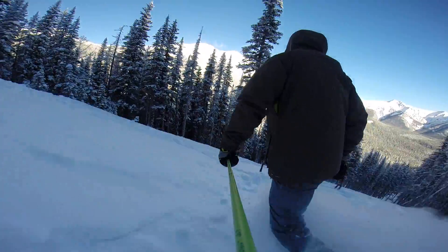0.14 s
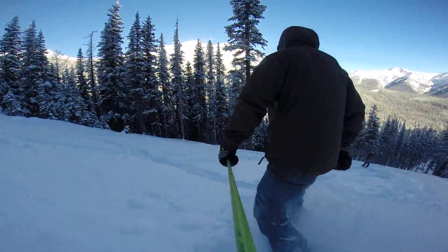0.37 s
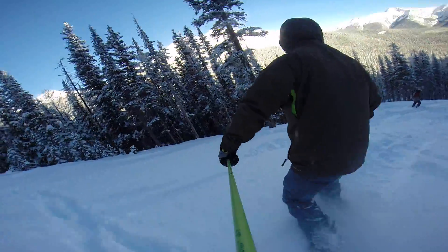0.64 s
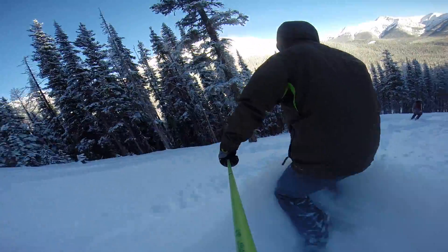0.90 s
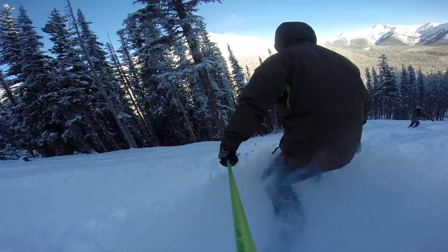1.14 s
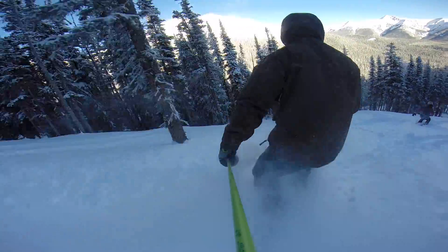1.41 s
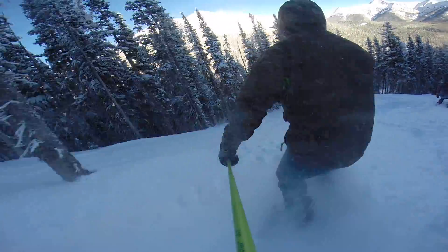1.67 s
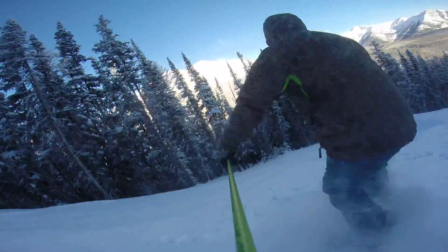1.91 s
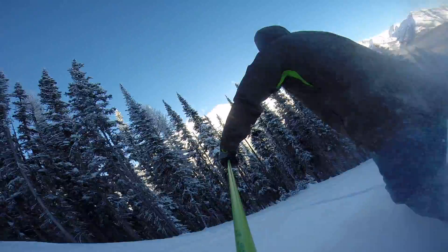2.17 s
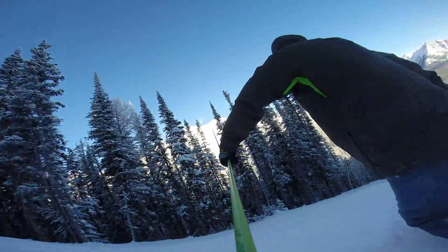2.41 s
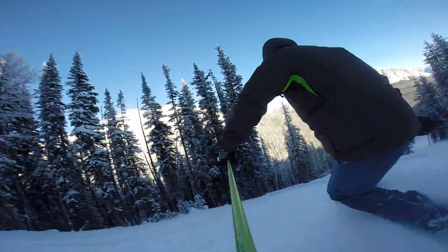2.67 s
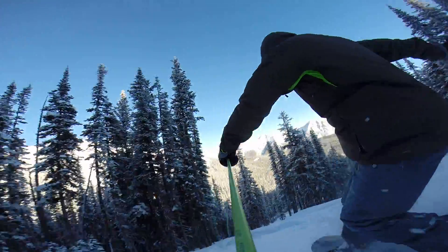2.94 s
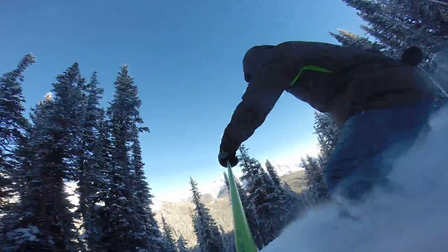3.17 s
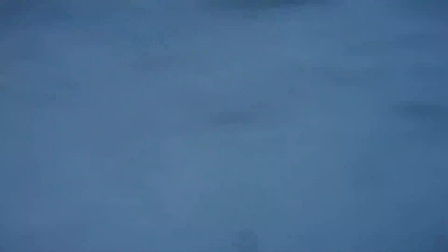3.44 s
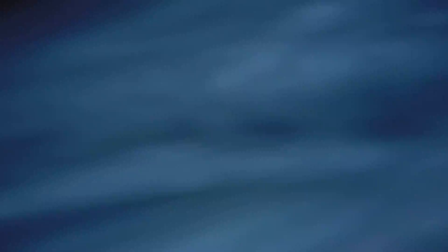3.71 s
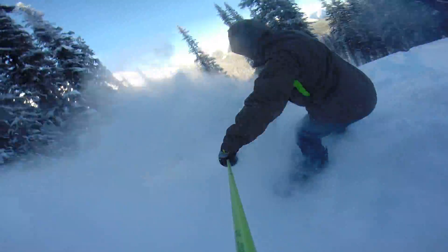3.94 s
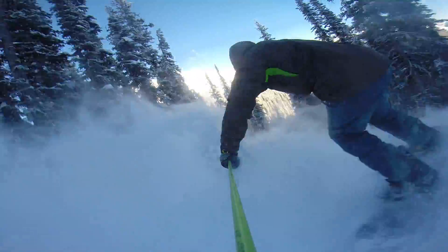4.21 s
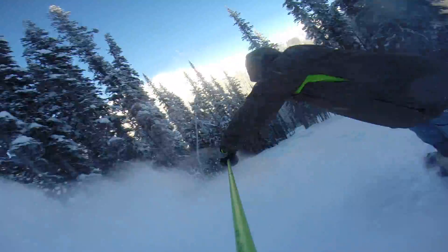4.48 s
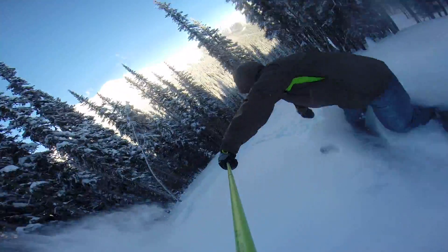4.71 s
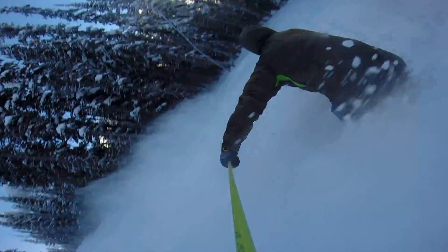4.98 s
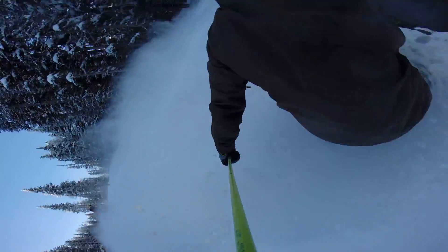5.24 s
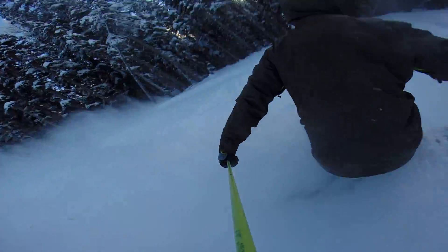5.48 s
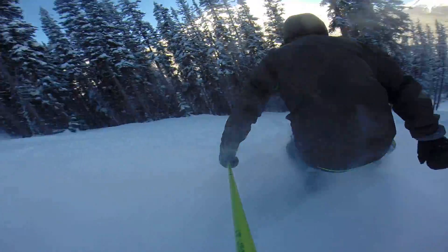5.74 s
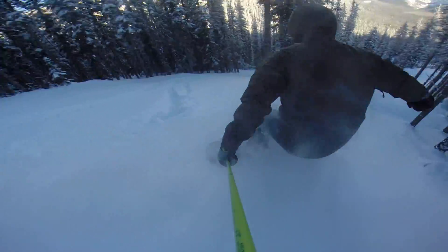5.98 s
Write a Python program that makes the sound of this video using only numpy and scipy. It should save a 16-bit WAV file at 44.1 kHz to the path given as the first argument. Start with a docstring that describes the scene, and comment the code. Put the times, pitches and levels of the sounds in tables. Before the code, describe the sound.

Heard from a microphone sealed in a case on a hand-held pole, a snowboard whispers through powder on an open mountain slope. Soft hisses and ticks grow into swishing crystal spray, then a lump of snow smashes into the case with loud crunches and thumps. After a brief lull come sharp icy knocks, a deep wobble and heavy churning snow, then softer hiss.

```python
"""A snowboard carves through deep powder: grains and noise hiss and churn, muffled by a camera's sealed case.
Thrown crystals patter on the case as clumped clicks; lumps of snow burst on it in rough noise,
the mount thumps in sagging sines, and icy bits tick the ringing wall. The hand-held pole hums in two bending modes,
wind buffets the case with eddies and broad noise, and the camera adds a faint whine and self-noise.
Table levels are fader moves; each layer adds its own trim."""
import sys
import numpy as np
from scipy import signal
from scipy.fft import rfft, irfft, next_fast_len
from scipy.io import wavfile
from scipy.ndimage import uniform_filter1d, map_coordinates

SR = 44100
rng = np.random.default_rng(int(sys.argv[2]) if len(sys.argv) > 2 else 0)


def int16_out(signal):
    """Quantize to a 16-bit WAV file."""
    q = np.round(np.clip(np.atleast_2d(signal).T, -1, 1) * 32767)
    wavfile.write(sys.argv[1], SR, q.astype(np.int16))


def attenuation_scalar(level_db):
    """Turn a level in dB into a linear amplitude multiplier (20 dB per decade)."""
    decades = np.asarray(level_db, float) / 20
    return 10 ** decades


N = 269892


def unit(x):
    """Scale to rms 1."""
    return x / np.sqrt(np.mean(x ** 2) + 1e-20)


def curves(rows):
    """One value per sample for each column after the time."""
    s, *cols = np.transpose(rows)
    return [np.interp(np.arange(N) / SR, s, c) for c in cols]


def wobble(rate):
    """A smooth random curve, rate knots a second."""
    knots = rng.standard_normal(int(N * rate / SR) + 4)
    return map_coordinates(knots, [np.arange(N) * rate / SR])


def filtered(x, response):
    """x times a complex response of frequency."""
    m = next_fast_len(len(x) + 8192)
    return irfft(rfft(x, m) * response(np.fft.rfftfreq(m, 1 / SR)), m)[:len(x)]


def coloured(x, spectrum):
    """x through (f/Hz, level/dB) points joined on a log frequency axis, at rms 1."""
    f, db = np.transpose(spectrum)

    def response(hz):
        return attenuation_scalar(np.interp(np.log(hz + 1), np.log(f + 1), db, -120, -120))

    return unit(filtered(x, response))


def resonance(f, centre, width):
    """Response of two equal bandpass resonances in a row."""
    return (1j * f * width / (centre * centre - f * f + 1j * f * width)) ** 2


def grit(per_second, spread_db):
    """Random tiny impacts of either sign, some bigger than the rest."""
    hit, size, sign = rng.random((3, N))
    height = attenuation_scalar(-spread_db * np.log(size + .01))
    return (hit < per_second / SR) * height * np.sign(sign - .5)


def fading(t, rise, t60):
    """Envelope of a blow: a quick rise and an exponential decay, both in seconds."""
    return attenuation_scalar(-60 * t / max(t60, .002)) * (1 - np.exp(-t / max(rise, 1e-4)))


def patches(x, depth_db):
    """Random louder and softer spots, about 1.5 kHz by 15 ms."""
    z = signal.stft(x, nperseg=256)[2]
    field = uniform_filter1d(rng.standard_normal(z.shape), size=9, axis=0)
    field = uniform_filter1d(field, size=5, axis=1)
    return unit(signal.istft(z * attenuation_scalar(depth_db * unit(field)), nperseg=256)[1][:N])


def swells(start, length, db, rise, fall, dome_db):
    """Gain of swells that climb at rise dB/s, arch by dome_db over their length and sink at fall dB/s."""
    late = np.arange(0, N + 32, 32)[None] / SR - np.asarray(start)[:, None]  # every 32 samples
    span = np.abs(length)[:, None] + 1e-3
    arch_db = -dome_db * np.clip(2 * late / span - 1, -1, 1) ** 2
    shape_db = arch_db + np.minimum(rise * late, 0) + np.minimum(fall * (span - late), 0)
    power = np.sum(attenuation_scalar(2 * (np.asarray(db)[:, None] + shape_db)), axis=0)
    return np.sqrt(np.interp(np.arange(N) / 32, np.arange(len(power)), power))


# the board ploughing snow: [t/s, hiss level/dB, low churn level/dB]
BOARD_MOVES = [(0, -75, -68), (.33, -56.5, -66.5), (.46, -81, -70), (1.0, -84, -70.5), (1.4, -65, -54.5),
               (1.55, -55.5, -64.5), (1.78, -56, -66), (1.9, -80, -68), (2.4, -67, -61), (2.5, -48, -55.5),
               (2.73, -57, -62.5), (2.86, -44.5, -58.5), (3.1, -46.5, -50.5), (3.8, -47, -52),
               (3.9, -53, -64), (3.97, -70.5, -71.5), (4.3, -70.5, -68), (4.7, -58, -64), (4.9, -62, -59.5),
               (5.09, -48.5, -41), (5.3, -51.5, -49), (5.4, -73, -60), (5.47, -67, -56.5), (5.52, -52, -45),
               (5.66, -51, -49), (5.7, -51, -64), (6.12, -69, -60.5)]
# colour of the fine hiss under the edge: [f/Hz, level/dB]
HISS_COLOUR = [(760, -46), (1300, -6), (1580, -1.5), (1780, 0), (2670, 1.5), (4200, -13.5), (4750, -32.5),
               (5630, -13.5), (6300, -30), (9000, -38.5), (11700, -73), (19800, -120)]
# colour of heavy churned snow, also of a wet squash: [f/Hz, level/dB]
CHURN_COLOUR = [(150, -15.5), (250, 1), (346, 1), (544, -8), (829, -1), (1300, -5.5), (1720, 2.5),
                (2120, -12), (2490, -2.5), (3280, -23.5), (5880, -13.5), (7750, -42.5), (12000, -46.5),
                (15600, -68), (22000, -120)]


def board():
    """Crushed powder: dense grains on noise, throbbing as the edge bites; the low churn crumbles coarsely."""
    hiss_db, churn_db = curves(BOARD_MOVES)
    bite = wobble(21.54)
    grains = rng.standard_normal(N) + .5 * unit(grit(1800, 4))
    hiss = coloured(patches(grains, 1.9), HISS_COLOUR)
    crumbs = rng.standard_normal(N) + 1.6 * unit(grit(380, 3.6))
    churn = coloured(patches(crumbs, 2.7), CHURN_COLOUR)
    hiss_throb_db = 1.1 * bite + 0.89 * wobble(70)
    churn_throb_db = .9 * bite + 2.3 * wobble(65)
    return attenuation_scalar(hiss_db - 3.0 + hiss_throb_db) * hiss + attenuation_scalar(churn_db + 2.0 + churn_throb_db) * churn


# fine crystals always drifting onto the case: [t/s, patter level/dB]
DRIFT_MOVES = [(0, -73.5), (1.15, -72.5), (1.5, -64), (1.85, -69), (2.05, -57.5), (2.85, -63), (2.9, -71),
               (3.42, -72), (3.5, -44.5), (3.78, -61.5), (3.82, -58.5), (3.97, -77), (4.3, -77),
               (4.45, -68), (4.9, -63), (5.1, -61.5), (5.44, -90), (5.65, -70), (6.12, -68.5)]
# sheets of thrown crystals sweeping the case: [start t/s, length t/s, patter level/dB]
SHEET_SWELLS = [(0.009, 0.0058, -50), (1.39, 0.053, -67), (1.557, 0.043, -62), (1.71, 0.082, -55.5),
                (1.893, 0.012, -59), (2.001, 0.0072, -55), (2.045, 0.053, -53), (2.171, 0.047, -45),
                (2.306, 0.028, -51), (2.349, 0.033, -46.5), (2.389, 0.057, -43.5), (2.471, 0.026, -49.5),
                (2.572, 0.024, -57), (2.63, 0.021, -54), (2.74, 0.031, -55.5), (2.816, 0.057, -50.5),
                (3.256, 0.06, -38), (3.335, 0.019, -56), (3.463, 0.0083, -23.5), (3.487, .02, -39),
                (3.65, 0.044, -45.5), (3.697, 0.024, -31.5), (3.74, 0.041, -42), (3.853, 0.068, -49),
                (4.02, 0.044, -65), (4.112, 0.041, -66), (4.185, 0.0062, -65.5), (4.313, 0.038, -67),
                (4.432, 0.012, -59.5), (4.707, .04, -62.5), (4.821, .02, -54), (4.982, 0.012, -55),
                (5.595, 0.0095, -70), (5.705, 0.012, -45), (5.77, 0.0066, -47.5), (5.82, 0.028, -67),
                (5.931, .02, -54), (6.025, 0.043, -64), (6.08, 0.029, -73)]
# colour of crystals on the case: [f/Hz, level/dB]
PATTER_COLOUR = [(530, -40), (900, -12.5), (1260, -22), (1660, -1), (2190, -4), (2500, 0.5), (3510, -3),
                 (3910, -12), (5750, 1), (6250, -5), (7960, -10.5), (13700, -15), (15400, -24.5),
                 (16000, -70)]
# resonances of the case wall, low to high: [f/Hz, width f/Hz, level/dB]
CASE_MODES = [(830, 840, 0), (2200, 1260, 7.5), (5230, 1270, 9.5), (8940, 1500, 2.5), (12040, 2700, 0)]
# how fast a sheet arrives and thins out (dB/s), and how far its edges lie under its crown (dB)
SHEET_RISE, SHEET_FALL, SHEET_DOME_DB = 1540, 1010, 3.5
# bigger crystals: (per second and resonance, dB against the drift fader, dB per kHz of resonance)
CRACKLE_PER_S, CRACKLE_DB, CRACKLE_TILT = 20, 1, -1.2


def spray():
    """Crystals click in clumps, as drift and sheets coloured by the case; bigger strays ring one wall mode each."""
    drift = attenuation_scalar(curves(DRIFT_MOVES)[0])
    sheets = swells(*np.transpose(SHEET_SWELLS), SHEET_RISE, SHEET_FALL, SHEET_DOME_DB)
    level = np.hypot(drift, sheets)
    rain = patches(1.1 * rng.standard_normal(N) + unit(grit(4000, 4.5)), 2)
    clumps_db = 1.4 * wobble(70) + 1.1 * wobble(250)
    crackle = np.zeros(N)
    for hz, width, _ in CASE_MODES[1:]:
        ringing = filtered(grit(CRACKLE_PER_S, 3.5), lambda f: resonance(f, hz, width))
        crackle += attenuation_scalar(CRACKLE_TILT * hz / 1e3) * ringing
    patter = level * attenuation_scalar(7.0 + clumps_db) * coloured(rain, PATTER_COLOUR)
    return patter + drift * attenuation_scalar(CRACKLE_DB) * unit(crackle)


# lumps of snow bursting on the case or crushed under the pole:
# [t/s, level/dB, treble level/dB against the lump, t60 t/s, wetness 0-1]
SNOW_LUMPS = [(1.269, -42, -26, 0.054, 0.5), (1.369, -36, -17, .06, 0.54), (1.399, -36, -22, 0.15, .62),
              (3.453, -0.5, -36, 0.15, 0.34), (3.644, -21.5, -8, 0.22, 0.52), (3.688, -8, -18, 0.091, 0.4),
              (3.704, -9, -26, 0.091, 0.4), (3.811, -5, -6, .029, 0.13), (4.911, -31.5, 11.5, 0.045, 0.3),
              (5.066, -23.5, -33, .086, 0.9), (5.076, -35, -27, .053, 0.6), (5.097, -22, -34, 0.055, 0.67),
              (5.116, -27, -32, 0.055, 0.91), (5.14, -30, -25, 0.088, 0.35), (5.204, -33, -30, 0.033, .8),
              (5.259, -22, -15, 0.051, 1), (5.292, -19, -13, 0.043, 1), (5.331, -27.5, -10.5, .086, 0.72),
              (5.601, -28, 0, 0.041, 0.34)]
# colour of a dry crunch: [f/Hz, level/dB]
CRUNCH_COLOUR = [(150, -14), (250, -1), (618, -10.5), (845, -5), (1070, -26), (1740, -5), (2040, -2.5),
                 (4000, -12.5), (5200, -21), (8800, -120)]
SPLAT_RISE_S = 0.003


def splats():
    """A lump shatters in a short rough rush: dry crunch or heavy squash, and the bright scatter of its crystals."""
    level, t = np.zeros((3, N + SR)), np.arange(SR // 4) / SR
    for s, db, treble_db, t60, wet in SNOW_LUMPS:
        wet = np.clip(wet, 0, 1)
        blend = np.array([[1 - wet], [wet], [attenuation_scalar(treble_db - 5.0)]])
        level[:, round(s * SR):][:, :len(t)] += attenuation_scalar(db - 3.5) * blend * fading(t, SPLAT_RISE_S, t60)

    def rough():
        return rng.standard_normal(N) + 1.1 * unit(grit(700, 5))

    crunch = coloured(rough(), CRUNCH_COLOUR)
    squash = coloured(rough(), CHURN_COLOUR)
    scatter = coloured(rng.standard_normal(N), PATTER_COLOUR)
    scatter = filtered(scatter, lambda hz: hz ** 4 / (hz ** 4 + 1400.0 ** 4))  # keep the treble
    return attenuation_scalar(0.98 * wobble(180)) * np.sum(level[:, :N] * [crunch, squash, scatter], axis=0)


# thumps into the mount: [t/s, level/dB, settled pitch f/Hz, t60 t/s, slap level/dB against the body]
MOUNT_THUMPS = [(0.814, -40.5, 151, 0.065, 4), (1.063, -48, 90.5, 0.066, 3), (1.266, -39, 156.3, 0.13, 1),
                (1.372, -34, 92, 0.11, -10), (1.397, -31.5, 151.4, 0.14, 2), (1.492, -41, 91.5, 0.045, 5),
                (3.452, -36, 113, 0.09, 0), (3.483, -14, 144.4, 0.19, 8), (3.654, -8.5, 168, 0.12, 0.5),
                (3.695, -2.5, 158, 0.058, 1.5), (3.781, -9.5, 99, 0.031, -5), (3.812, -6, 101.7, 0.034, -6),
                (4.196, -43, 93, 0.036, -3), (4.321, -24, 91.5, 0.097, -5), (4.813, -39, 91.5, 0.064, 9.5),
                (4.963, -11, 105.6, 0.022, -3.5), (5.099, -23.5, 91.5, 0.11, -13),
                (5.26, -33, 99, 0.072, 9.5), (5.291, -16, 103, 0.038, 3), (5.437, -31, 92, 0.07, -6)]


def thumps():
    """The mount gives a few dull cycles whose pitch sags, under a brief low slap."""
    out, t = np.zeros(N + SR), np.arange(SR // 3) / SR
    for s, db, hz, t60, slap_db in MOUNT_THUMPS:
        sag = t + 0.0042 * (1 - np.exp(-t / 0.029))  # starts about 14 % sharp
        body = fading(t, 0.0012, t60) * np.sin(2 * np.pi * hz * sag)
        slap_tone = np.sin(2 * np.pi * rng.uniform(200, 416) * t)
        slap = attenuation_scalar(slap_db) * fading(t, 0.0022, 0.016) * slap_tone
        out[round(s * SR):][:len(t)] += attenuation_scalar(db + 2) * (body + slap)
    return out[:N]


# single icy bits striking the case: [t/s, level/dB, low knock level/dB, high snap level/dB]
ICE_TICKS = [(.0497, -46.5, -9, -1), (.161, -44, -11, -3), (.18, -43.5, 2, -8), (.308, -40.5, -3, -20),
             (.364, -38.5, -18, -26), (.4589, -45.5, -13, -7), (.586, -40, -20, -20), (.627, -41, -20, -12),
             (1.1048, -41, -25, -11.5), (1.1433, -36, -18, -20), (1.2022, -48, 5, -22),
             (1.265, -48.5, -1, 1), (1.3195, -29, -21, -13), (1.4003, -43, 1, -15), (1.62, -54, -30, 7),
             (1.655, -46, -30, 5), (1.7055, -39.5, -23, -1.5), (2.3616, -21, -32, -7.5),
             (2.574, -25, -18, -13.5), (2.825, -26.5, -10, -6), (2.8519, -23, -17, -10.5),
             (3.244, -42, -25, 3), (3.307, -26, -25, -8), (3.6951, -4, -38, -6.5), (3.8132, -19, -12, 0.5),
             (4.0445, -38, -23, -12.5), (4.1401, -46.5, -29.5, -4.5), (4.1975, -34.5, -1.5, -11.5),
             (4.309, -41.5, -5, -5.5), (4.7388, -30.5, -6, -11), (4.8183, -28, -1, -9),
             (4.8308, -31.5, -19, -1.5), (4.8519, -33, -32, -2.5), (4.9385, -18, -25, -15),
             (4.958, -39, 5, 5), (4.9644, -6, -6, -11), (5.437, -44, 18, -24), (5.4874, -36.5, -10, -22),
             (5.574, -26, -20, -20), (5.6746, -40.5, -17, -0.5), (5.706, -34, -27, 1),
             (5.7374, -33.5, -11, -9), (5.7649, -23, -14, -30), (5.8105, -33, -21.5, -8.5),
             (6.0046, -35, -9, -4)]
TICK_T60_S = .007


def ticks():
    """A bit of ice gives a crack that rings the wall; heavy bits knock low, light ones snap high."""
    out, t = np.zeros(N + SR), np.arange(SR // 20) / SR
    for s, db, knock_db, snap_db in ICE_TICKS:
        mode_db = [knock_db + 6, 0, *[snap_db + 5] * 3]
        gains = attenuation_scalar(mode_db + rng.normal(0, 1.5, len(CASE_MODES)))

        def wall(f):
            return sum(g * attenuation_scalar(d) * resonance(f, hz, width) for g, (hz, width, d) in zip(gains, CASE_MODES))

        crack = 0.24 * fading(t, 0.000097, TICK_T60_S) * rng.standard_normal(len(t))
        crack[0] = 1  # one clean blow, then crumbs
        out[round(s * SR):][:len(t)] += attenuation_scalar(db + 11.5) * filtered(crack, wall)
    return out[:N]


# steady shaking of the pole by hand and wind: [t/s, low mode level/dB, high mode level/dB]
SHAKE_MOVES = [(0, -41, -45.5), (.6, -47.5, -51), (1.3, -44.5, -46), (1.7, -43.5, -48), (2.3, -38.5, -38.5),
               (3.1, -45.5, -49), (3.8, -38, -38), (3.95, -48, -50), (4.27, -42, -50.5), (4.4, -38, -35.5),
               (4.72, -34.5, -46.5), (5.1, -21, -37.5), (5.6, -32, -33.5), (5.78, -32.5, -41.5),
               (6.12, -39, -44)]
# jolts that swing the pole harder: [t/s, length t/s, low mode level/dB, high mode level/dB]
POLE_JOLTS = [(0.15, 0.1, -44.5, -63), (0.839, 0.032, -37, -41), (1.136, 0.034, -35, -62),
              (1.438, 0.042, -33.5, -34.5), (2.06, 0.077, -35, -28.5), (2.23, .03, -38, -31.5),
              (2.851, 0.12, -34, -33), (3.134, 0.019, -36, -55), (3.271, 0.031, -34.5, -38),
              (3.489, 0.013, -24.5, -11.5), (3.598, 0.014, -21.5, -29), (3.703, 0.024, -18, -15.5),
              (3.818, 0.019, -36, -22.5), (4.33, 0.032, -36, -26.5), (4.484, 0.051, -33.5, -43),
              (4.878, 0.013, -21, -38), (4.974, 0.03, -12.5, -25.5), (5.302, 0.025, -26, -24),
              (5.52, .06, -26.5, -34), (5.875, 0.084, -35.5, -36.5)]
# the pole's bending modes: [f/Hz, width f/Hz]
POLE_MODES = [(34, 11.1), (65, 9.4)]
# how fast a jolt builds and dies, low mode and high mode (dB/s)
JOLT_RISE, JOLT_FALL = (180, 440), (230, 300)
JOLT_DOME_DB = 1.5  # how far a jolt's edges lie under its crown


def pole():
    """Random shaking and jolts ring each bending mode; the swings are kept fairly even."""
    out = np.zeros(N)
    s, length, *jolt_db = np.transpose(POLE_JOLTS)
    modes = zip(curves(SHAKE_MOVES), jolt_db, JOLT_RISE, JOLT_FALL, POLE_MODES)
    for shake_db, db, rise, fall, (hz, width) in modes:
        swing = unit(filtered(rng.standard_normal(N), lambda f: np.exp(-((f - hz) / width) ** 2)))
        size = np.abs(signal.hilbert(swing, next_fast_len(N)))[:N]
        even_swing = unit(swing / (size + 1.1))
        jolts = swells(s, length, db, rise, fall, JOLT_DOME_DB)
        out += np.hypot(attenuation_scalar(shake_db), jolts) * even_swing
    return out


# wind on the case; eddy shedding follows air speed: [t/s, buffet level/dB, shedding f/Hz]
WIND_MOVES = [(0, -53.5, 105.5), (.7, -60, 101), (1.33, -52, 98.6), (1.7, -56.5, 96.2), (1.94, -46.5, 100),
              (2.35, -43, 121), (2.55, -42.5, 104.3), (2.8, -43, 91.4), (3.25, -44.5, 132.2),
              (3.65, -43, 126.3), (3.87, -60, 123), (4.14, -65, 117.7), (4.5, -59.5, 110.6),
              (4.94, -48.5, 140.4), (5.11, -32.5, 152.2), (5.19, -39, 135.6), (5.32, -49.5, 120),
              (5.69, -43.5, 139.7), (5.85, -55.5, 138.5), (6.12, -60.5, 141)]


def wind():
    """Eddies shed off the case at a rate that follows speed, over broad buffeting with small low knocks."""
    db, hz = curves(WIND_MOVES)
    shedding_hz = hz * (1 + .07 * wobble(25))
    eddies = attenuation_scalar(3 * wobble(25)) * np.sin(2 * np.pi * np.cumsum(shedding_hz) / SR)
    gusts = rng.standard_normal(N) + .6 * unit(grit(29, 1.3))
    broad = coloured(gusts, [(60, -27.0), (90, -4.5), (140, 8.0), (220, -3.0), (450, -36.5)])
    return attenuation_scalar(db - 1) * unit(eddies) + attenuation_scalar(db - 8.5 + 2.5 * wobble(25)) * broad


# faint electronic whine, overtones of the sensor's line clock:
# [multiple, rms level/dB, before the gain in NOISE_GAIN]
WHINE_OVERTONES = [(3, -89), (4, -79), (5, -83)]
# colour of the self-noise: [f/Hz, level/dB]
SELF_NOISE_COLOUR = [(120, -39), (200, 5.5), (1160, -12), (3370, -12), (4350, -20), (5630, -13),
                     (10500, -37), (11700, -38), (15100, -30), (16000, -58)]
# the recorder's automatic gain sinks after the loudest blows and recovers,
# drawn here as a set curve on whine and self-noise alone: [t/s, level/dB]
NOISE_GAIN = [(3.45, 5), (3.9, -12), (4.3, -6), (4.9, 7)]
LINE_HZ, FRAME_HZ = 2926.4, 29.97


def camera():
    """Self-noise, and a whine of sines that restarts with every picture frame."""
    in_frame = np.arange(N) / SR % (1 / FRAME_HZ)
    whine = np.zeros(N)
    for k, db in WHINE_OVERTONES:
        whine += attenuation_scalar(db + 3) * np.sin(2 * np.pi * k * LINE_HZ * in_frame)  # +3 dB: rms to peak
    self_noise = attenuation_scalar(-65.5) * coloured(rng.standard_normal(N), SELF_NOISE_COLOUR)
    return attenuation_scalar(curves(NOISE_GAIN)[0]) * (whine + self_noise)


def scene():
    """All layers sum at one microphone in the case."""
    moving = board() + spray() + splats() + thumps() + ticks()
    return (moving + pole() + wind() + camera())[None]


def low_pass(x):
    """Removes everything above the highest recorded frequency."""
    return signal.sosfilt(signal.butter(12, 16550, fs=SR, output="sos"), x)


TOP_HZ = 15300  # treble roll-off of the input


def record(dry):
    """The input saturates softly near full scale and rolls off steeply at the top."""
    soft = dry[0] / (1 + np.abs(dry[0]) ** 6) ** (1 / 6)
    wet = filtered(soft, lambda hz: 1 / np.sqrt(1 + (hz / TOP_HZ) ** 60))[None]
    return low_pass(wet)


dry = scene()
out = record(dry)
int16_out(out)
```